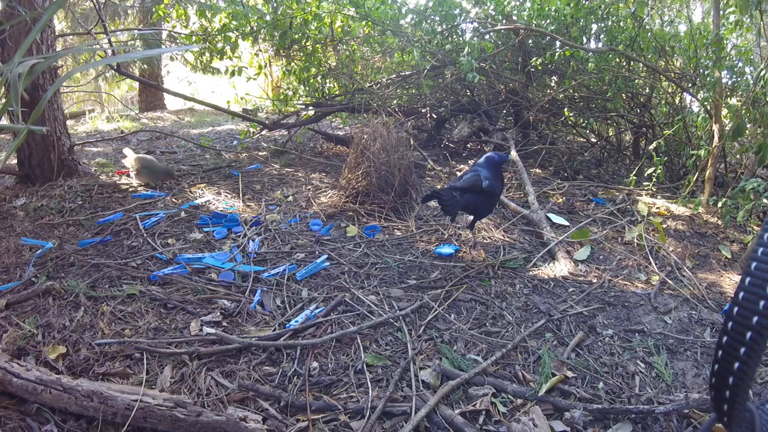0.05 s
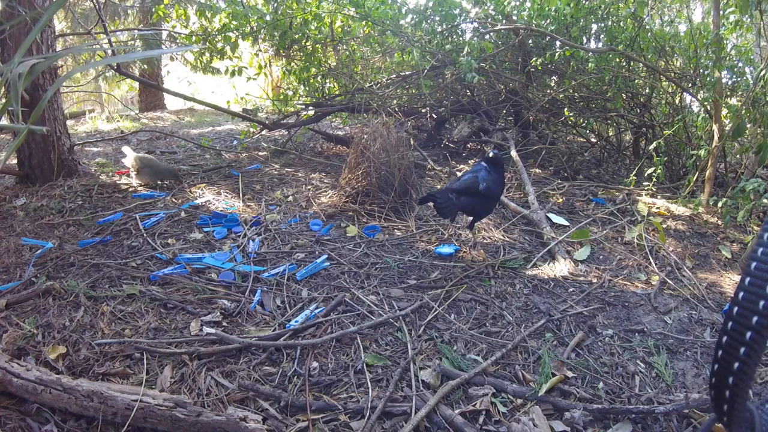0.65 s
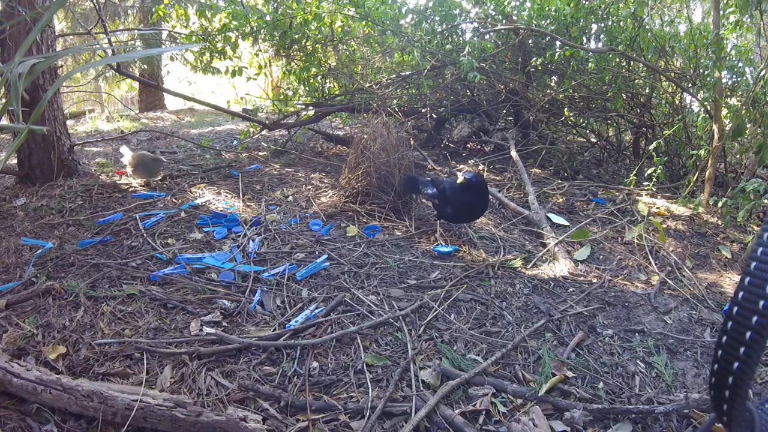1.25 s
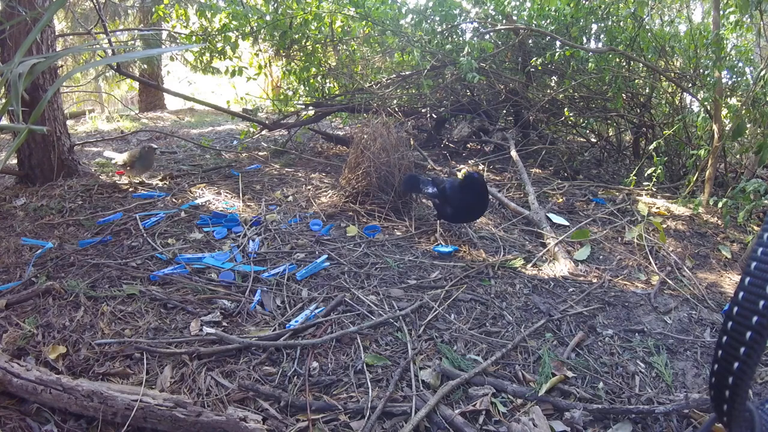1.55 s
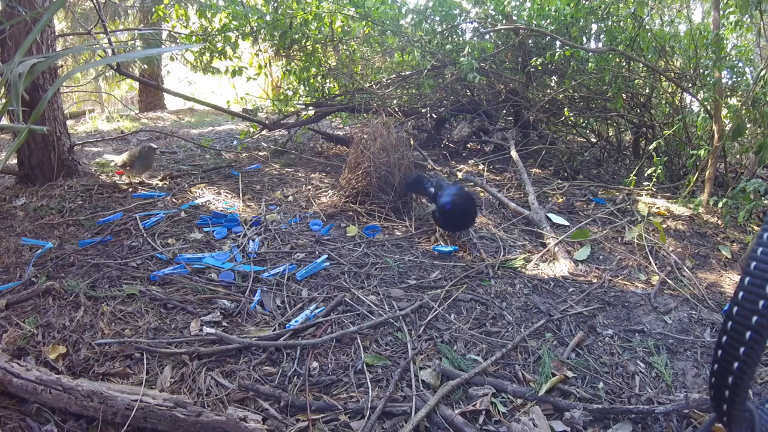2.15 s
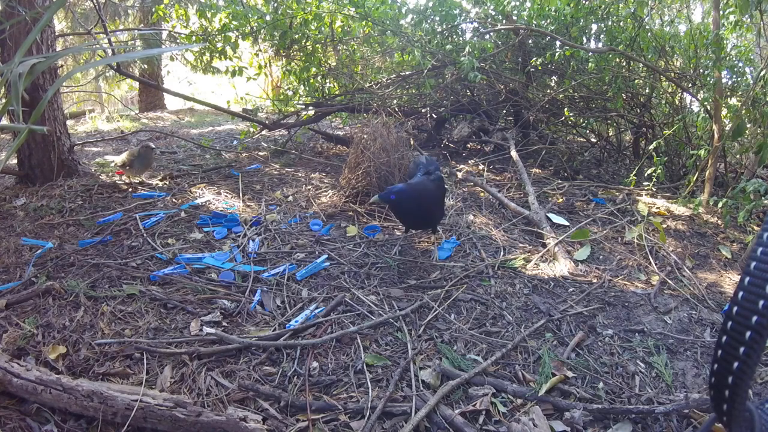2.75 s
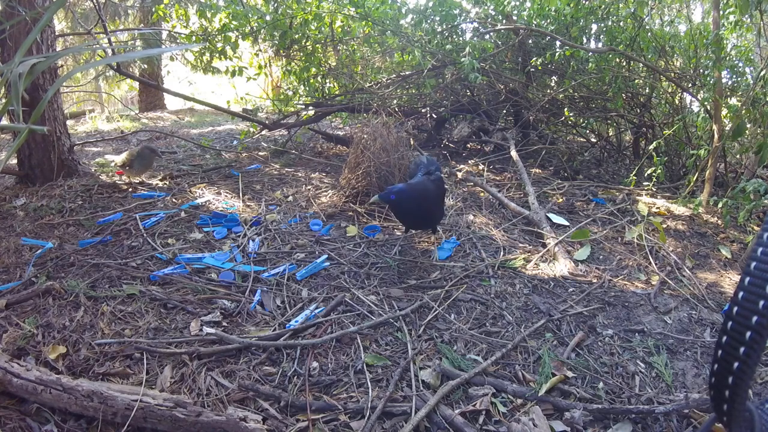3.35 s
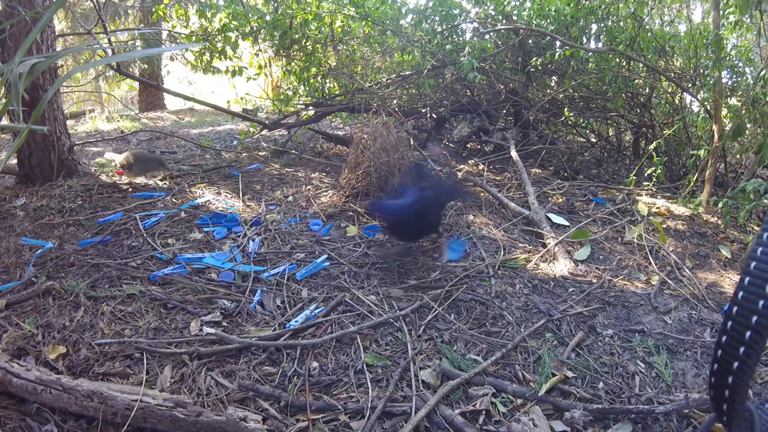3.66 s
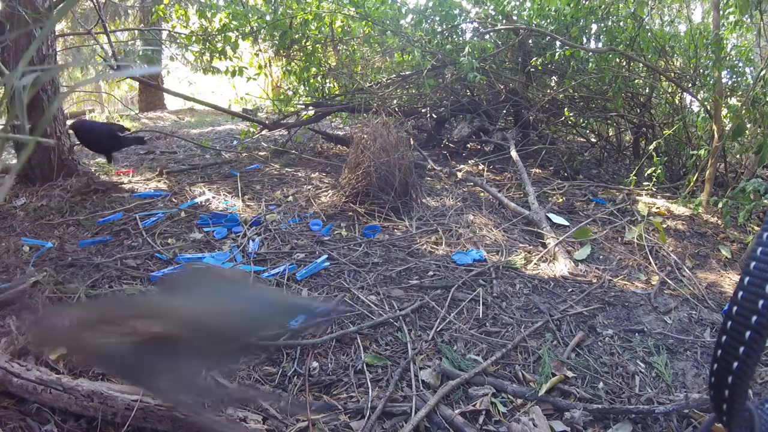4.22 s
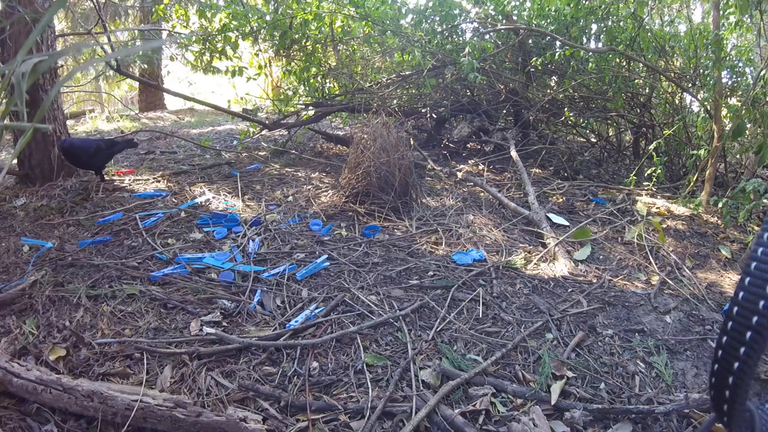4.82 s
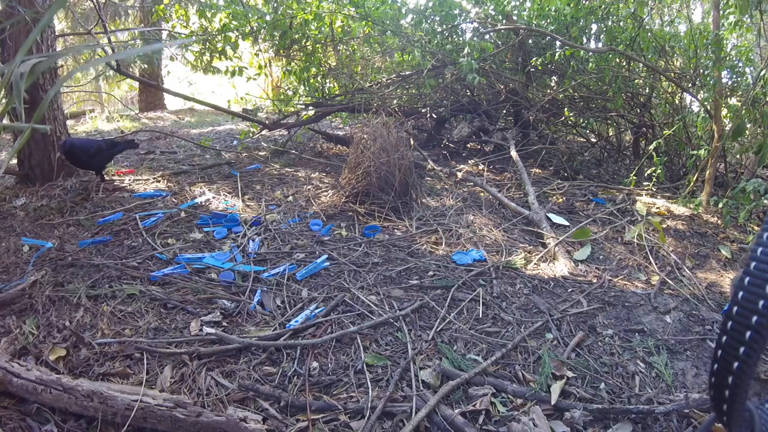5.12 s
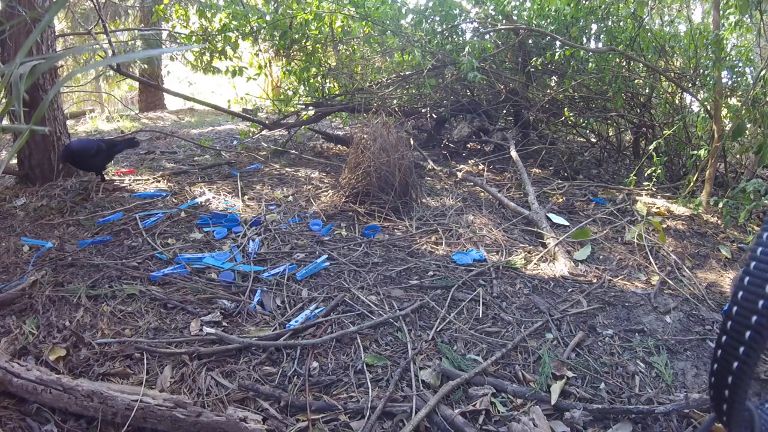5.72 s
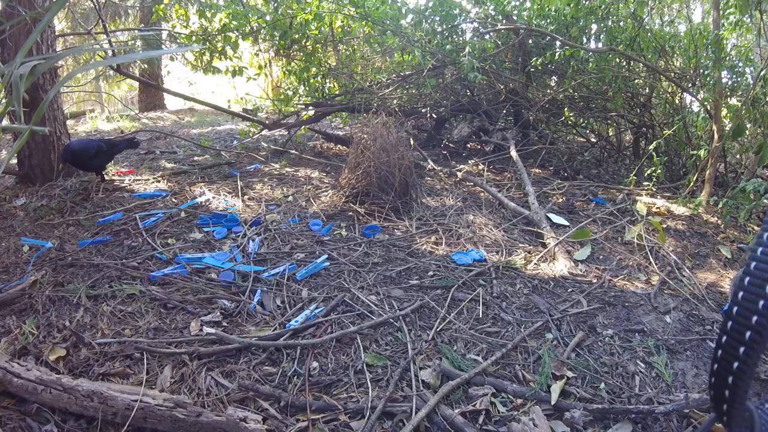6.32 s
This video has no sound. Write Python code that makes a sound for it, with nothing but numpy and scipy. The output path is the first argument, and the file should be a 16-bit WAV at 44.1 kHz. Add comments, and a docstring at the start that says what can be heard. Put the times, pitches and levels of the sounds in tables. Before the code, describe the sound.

On a forest floor, a male bowerbird gives one high, rasping chirp, then three louder ones in quick succession. Four hoarse, wheezy squawks follow, the longest carrying two falling whistles. Two birds take off with soft wingbeats through crackling leaves; one bumps something hollow and brushes close past the microphone. Two quieter hisses and a faint peep finish, over a low outdoor rumble.

```python
"""Forest floor, mono, over a low rumble, hum and faint hiss. A male bowerbird displays: four trilled,
rasping chirps, then four squawks (croak, then buzz and breath through throat and beak) with two sliding
whistles from the other side of the syrinx. Two birds take off through crackling leaf litter; one bumps
something hollow and brushes close by. The male ends with two quieter hisses and a soft peep between.
Trunks and bushes add a short echo to the calls and the litter."""
import sys
import numpy as np
from scipy import signal
from scipy.fft import rfft, irfft, next_fast_len
from scipy.io import wavfile
from scipy.ndimage import map_coordinates

SR = 44100
rng = np.random.default_rng(int(sys.argv[2]) if len(sys.argv) > 2 else 0)


def transcribe(u):
    """Save the signal u as a 16-bit wav file named by the first command-line argument.

    u: samples, shape (n,) or (channels, n), limited to [-1, 1]; the rate is SR.
    q: integer samples, one column per channel.
    """
    v = np.clip(np.atleast_2d(u).T, -1, 1)
    q = np.round(v * 32767).astype(np.int16)
    wavfile.write(sys.argv[1], SR, q)


N = 285768

# open beak response (frequency [Hz], gain [dB])
BEAK_RESPONSE = [(3000, -35), (4200, -8), (5200, 5), (5700, 2.5), (6400, 0), (7000, -15), (8500, -23.5),
                 (12000, -61), (15000, -77)]
# throat response in a hiss (frequency [Hz], gain [dB])
HISS_THROAT_RESPONSE = [(800, -32), (1400, -14), (1700, -1.5), (2050, 2.5), (2350, -0.5), (2850, 2.5),
                        (3600, -3.5), (4500, -9), (5500, -44)]
# dull impact (frequency [Hz], level [dB])
KNOCK_SPECTRUM = [(60, -26), (180, -17), (600, 0.5), (1000, -8), (1600, -17), (2400, -19), (4000, -64)]


def amp(db):
    """Decibels to gain."""
    return 10 ** (np.asarray(db) / 20)


def unit(x):
    """Scale to rms 1."""
    return x / np.sqrt(np.mean(x ** 2) + 1e-20)


def along(points, hz):
    """Interpolate (frequency [Hz], value) points on a log axis."""
    freqs, values = np.transpose(points)
    return np.interp(np.log(hz + 1), np.log(freqs + 1), values)


def clock(length_s):
    """Sample times [s]."""
    return np.arange(int(length_s * SR)) / SR


def add(track, start_s, x):
    """Mix x into the track."""
    i = int(np.clip(round(start_s * SR), 0, N))
    track[i:i + len(x)] += x[:N - i]


def white(n):
    """White noise, n samples."""
    return np.random.default_rng(rng.integers(2 ** 31)).standard_normal(n)


def wobble(n, rate_hz):
    """Smooth random curve with knots at rate_hz."""
    return map_coordinates(white(int(n * rate_hz / SR) + 4), [np.arange(n) * rate_hz / SR])


def colour(x, spectrum):
    """Filter by (frequency [Hz], gain [dB]) points; output at rms 1."""
    size = next_fast_len(len(x) + 2048)
    gain = amp(along(spectrum, np.fft.rfftfreq(size, 1 / SR)))
    return unit(irfft(rfft(x, size) * gain, size)[:len(x)])


def glide(x, speed):
    """Scale all frequencies by a varying factor."""
    return map_coordinates(x, [np.cumsum(speed)], mode="mirror")


def soft(x):
    """Fade both ends over 4 ms."""
    return x * signal.windows.tukey(len(x), .008 * SR / len(x))


def envelope(t, attack_s, length_s, release_s):
    """Linear rise, hold until length_s, exponential decay."""
    return np.clip(t / attack_s, 0, 1) * np.exp(-np.maximum(t - length_s, 0) / release_s)


def phase_of(hz):
    """Running phase [rad] of a frequency curve."""
    return 2 * np.pi * np.cumsum(hz) / SR


def blend(clean, noise, share):
    """Mix by the noise's share of the power."""
    share = np.clip(share, 0, 1)
    return np.sqrt(1 - share) * clean + np.sqrt(share) * noise


def buzzing(phase, orders):
    """Hoarse voice: each partial drifts in level and phase."""
    n = len(phase)
    voice = np.zeros(n)
    for k in orders:
        gain = amp(2.5 * wobble(n, 60))
        voice += gain * np.cos(k * (phase + .05 * wobble(n, 350)) + 2 * np.pi * rng.random())
    return unit(voice)


def background(rumble_db=-55.5, air_db=-66, hum_hz=74, hum_db=-57):
    """Outdoor rumble, wavering hum, thin steady hiss."""
    rumble_spectrum = [(12, -31), (22, -3.5), (35, -2), (50, -1), (70, -4.5), (100, -5.5), (163, -11),
                       (260, -16), (409, -21.5), (573, -23), (853, -23.5), (1170, -25.5), (3000, -32.5),
                       (3900, -50), (6600, -120)]  # (frequency [Hz], level [dB])
    air_spectrum = [(1500, -32), (3000, -11), (4300, -14.5), (5800, -9.5), (6200, -7.5), (6500, 4.5),
                    (7000, -3.5), (8500, -6), (10000, -13.5), (12000, -13), (13200, -21), (14000, -41)]  # (frequency [Hz], level [dB])
    hum = np.sqrt(2) * np.sin(phase_of(hum_hz * (1 + .03015 * wobble(N, 12))))
    hum *= amp(hum_db + .99 * wobble(N, 6))
    rumble = amp(rumble_db) * colour(white(N), rumble_spectrum)
    return hum + rumble + amp(air_db) * colour(white(N), air_spectrum)


def forest_echo(x):
    """Trunks and bushes scatter a short, bright tail."""
    scatter = [(300, -29), (1500, 6.5), (3000, 5), (4100, -4), (5200, 2), (6400, 3), (7500, 3),
               (12000, -15)]  # twig reflection (frequency [Hz], gain [dB])
    decay = [(200, 0.17), (2000, 0.16), (6000, 0.21), (12000, 0.096)]  # echo decay (frequency [Hz], t60 [s])
    hz, t, bins = signal.stft(white(SR // 3), SR, nperseg=256)
    gain = amp(along(scatter, hz)[:, None] - 60 * t / along(decay, hz)[:, None])
    tail = signal.istft(bins * gain, SR, nperseg=256)[1]
    return signal.fftconvolve(x, np.pad(tail, (200, 0)) / np.linalg.norm(tail))[:N]


def leaf_litter(rustle_db=-1, grain_db=3.5, fall_s=.034, snap_t60_s=.014, settle_db=-17, settle_t60_s=.22):
    """Feet and wings stir dry leaves in grainy swells; twigs snap and the leaves settle."""
    scuffs = [(3.755, 0.055, -45), (3.89, 0.065, -47.5), (3.947, 0.012, -46.5), (4.08, 0.064, -43),
              (4.195, .04, -51), (4.419, 0.083, -46), (4.615, 0.076, -47.5)]  # rustle swells (crest [s], rise [s], level re rustle_db [dB])
    snaps = [(.337, -46.5), (3.644, -36.5), (3.664, -35), (3.689, -32), (3.887, -30.5), (3.942, -35.5),
             (3.95, -27.5), (3.989, -29.5), (4.017, -28.5), (4.024, -25), (4.123, -30), (4.186, -36.5),
             (4.302, -36), (4.505, -36.5)]  # twig, leaf and quill ticks (time [s], peak [dB])
    leaf_spectrum = [(290, -8), (500, -4), (616, -7.5), (1030, -15.5), (1590, -5.5), (2160, -7.5),
                     (2520, -7), (4160, -7.5), (5740, 5.5), (9210, -12.5), (12500, -28.5), (14000, -53)]  # (frequency [Hz], level [dB])
    t = np.arange(N) / SR
    swells = [amp(db) * np.exp(-np.maximum((crest_s - t) / rise_s, (t - crest_s) / fall_s))
              for crest_s, rise_s, db in scuffs]
    grains = colour(white(N) * amp(grain_db * wobble(N, 1200)), leaf_spectrum)
    out = amp(rustle_db) * np.linalg.norm(swells, axis=0) * grains
    t = clock(.1)
    lead = SR // 200
    fade = amp(-60 * t / snap_t60_s) + amp(settle_db - 60 * t / settle_t60_s)
    for at_s, peak_db in snaps:
        snap = colour(np.pad(fade * white(len(t)), (lead, 0)), leaf_spectrum)
        add(out, at_s - lead / SR, amp(peak_db) * snap / np.abs(snap).max())
    return out


def footfalls(decay_s=.0085):
    """Feet knock dully on twigs and ground."""
    kicks = [(3.886, -42.5), (3.948, -49.5), (4.02, -47)]  # (time [s], level [dB])
    out = np.zeros(N)
    t = clock(6 * decay_s)
    for at_s, db in kicks:
        add(out, at_s, soft(amp(db) * np.exp(-t / decay_s) * colour(white(len(t)), KNOCK_SPECTRUM)))
    return out


def wingbeats(push_hz=36, push_width_s=.014, whoosh_width_s=.02):
    """Each stroke pushes a slow air wave with a soft whoosh."""
    strokes = [(3.824, -42, -48), (3.887, -43, -52), (3.954, -50, -53), (3.996, -43, -53),
               (4.055, -46, -47.5), (4.109, -42, -51.5), (4.142, -58, -47), (4.177, -58, -47.5),
               (4.435, -44.5, -60)]  # (time [s], push [dB], whoosh [dB])
    whoosh_spectrum = [(60, -7), (130, 1.5), (220, 0), (330, -5.5), (620, -11), (1200, -15.5), (3000, -32),
                       (8000, -60)]  # (frequency [Hz], level [dB])
    out = np.zeros(N)
    t = np.arange(-SR // 10, SR // 10) / SR
    push = np.sqrt(2) * np.sin(2 * np.pi * push_hz * t) * np.exp(-(t / push_width_s) ** 2)
    for at_s, push_db, whoosh_db in strokes:
        whoosh = colour(white(len(t)), whoosh_spectrum) * np.exp(-(t / whoosh_width_s) ** 2)
        add(out, at_s + t[0], amp(push_db) * push + amp(whoosh_db) * whoosh)
    return out


def feather_brush(closest_s=4.328, closest_db=-26.5, width_s=.0029, lead_s=.022, trail_s=.1):
    """Feathers brush past; level falls with distance."""
    feather_spectrum = [(350, -60), (600, -27), (1190, -15), (1430, -26), (2540, -15), (3030, -7),
                        (4010, -14.5), (6400, 4), (7510, -5), (9430, -6.5), (14700, -41)]  # (frequency [Hz], level [dB])
    out = np.zeros(N)
    t = clock(lead_s + trail_s) - lead_s
    feathers = colour(white(len(t)) * amp(3.4 * wobble(len(t), 1504)), feather_spectrum)
    add(out, closest_s - lead_s, soft(amp(closest_db) * feathers / np.hypot(1, t / width_s)))
    return out


def hollow_bumps(attack_s=.0022, knock_db=-12, knock_t60_s=.14):
    """Soft blows ring the low modes of a nearby hollow object."""
    blows = [(4.201, -22), (4.243, -41), (4.45, -44)]  # (time [s], level [dB])
    modes = [(124.7, -12.5, 0.37), (164, -7.5, 0.36), (202.8, 5.5, 0.19), (206, -15, 0.87),
             (233.7, -4, 0.3), (339, -10, 0.24), (379, -8, 0.14), (490, -1, 0.095), (523, -10, 0.21),
             (564, -12, 0.16), (718, -10.5, 0.11), (857, -15.5, 0.11), (1010, -17, 0.055),
             (1470, -17, 0.069)]  # (frequency [Hz], level re blow [dB], t60 [s])
    out = np.zeros(N)
    t = clock(.6)
    onset = 1 - np.exp(-(t / attack_s) ** 2)
    for at_s, db in blows:
        ring = np.zeros(len(t))
        for hz, mode_db, t60_s in modes:
            gain = amp(mode_db + rng.normal(0, 1) - 60 * t / t60_s)
            ring += gain * np.sin(2 * np.pi * hz * t + rng.normal(0, .92))
        knock = amp(knock_db - 60 * t / knock_t60_s) * colour(white(len(t)), KNOCK_SPECTRUM)
        add(out, at_s, amp(db) * (ring + knock) * onset)
    return out


def bill_clicks(decay_s=.0049):
    """The bill snaps shut and rings briefly."""
    clicks = [(.999, -43.5), (1.017, -48)]  # (time [s], level [dB])
    out = np.zeros(N)
    t = clock(8 * decay_s)
    for at_s, db in clicks:
        add(out, at_s, amp(db) * np.exp(-t / decay_s) * colour(white(len(t)), BEAK_RESPONSE))
    return out


def peep(start_s=6.2, length_s=.068, crest_hz=408, pitch_arch=.049, db=-65.5):
    """Soft nasal note: partials 4 and 5 of an arching pitch, through the throat."""
    out = np.zeros(N)
    rise = np.sin(np.pi * clock(length_s) / length_s)
    voice = buzzing(phase_of(crest_hz * (1 - pitch_arch * (1 - rise))), (4, 5))
    add(out, start_s, amp(db) * rise ** 2 * colour(voice, HISS_THROAT_RESPONSE))
    return out


def hisses(throat_attack_s=.026, beak_attack_s=.17, release_s=.021):
    """Voiceless breath starts in the throat; then the beak opens."""
    calls = [(5.54, .32, -55.5, -48), (6.417, .075, -57, -51)]  # (start [s], length [s], throat [dB], beak [dB])
    beak_response = [(3500, -20), (4600, -8), (4950, 0), (5250, -7), (5520, 7), (5700, 0), (6100, -6),
                     (6500, -17), (9000, -32), (13000, -60)]  # (frequency [Hz], gain [dB])
    out = np.zeros(N)
    for start_s, length_s, throat_db, beak_db in calls:
        t = clock(length_s + 4 * release_s)
        throat = amp(throat_db) * colour(white(len(t)), HISS_THROAT_RESPONSE)
        beak = amp(beak_db) * colour(white(len(t)), beak_response)
        add(out, start_s, throat * envelope(t, throat_attack_s, length_s, release_s))
        add(out, start_s, beak * envelope(t, beak_attack_s, length_s, release_s))
    return out


def wheeze_arches(time_s, hz, throat_db=0, beak_db=0, rough=.903, flatness=3.25):
    """Pitch, roughness and levels of a wheeze as it arches up into a clearer voice."""
    # (crest [s], half length [s], crest pitch [Hz], roughness [0-1], throat [dB], beak [dB])
    arches = [(1.618, .03, 733, 0.13, -44, -41), (2.101, 0.035, 862, 0.02, -39, -39),
              (2.181, 0.043, 761, 0.3, -38, -39), (2.476, 0.044, 959, 0.17, -38, -38.5),
              (2.649, .042, 882, 0.22, -40.5, -35.5), (2.837, 0.041, 720, 0.75, -43.5, -39.5),
              (3.297, 0.034, 860, 0.14, -41.5, -42.5)]
    for crest_s, half_s, crest_hz, crest_rough, crest_throat_db, crest_beak_db in arches:
        away = np.minimum(np.abs(time_s - crest_s) / half_s, 1)
        clear = 1 - away ** flatness
        hz = hz + (crest_hz - hz) * (1 - away ** 2)
        rough = rough + (crest_rough - rough) * clear
        throat_db = throat_db + (crest_throat_db - throat_db) * clear
        beak_db = beak_db + (crest_beak_db - beak_db) * clear
    return hz, rough, throat_db, beak_db


def whistles(drop=.47, bend=1.31, swell_db=7.5, edge_s=.0066, hoarse_hz=680):
    """The other side of the syrinx holds a note, then slides down; the buzz adds side bands."""
    notes = [(2.402, 0.00304, 0.0232, 2150, -49), (2.617, 0.034, .028, 2305, -39.5)]  # (start [s], hold [s], slide [s], held pitch [Hz], held level [dB])
    # beak resonance (frequency [Hz], gain [dB])
    beak_lift = [(2800, -26), (4600, -1.5), (5500, 2), (7200, -36)]
    octave_db, low_band_db, high_band_db = 2, -9, -3
    out = np.zeros(N)
    for start_s, hold_s, slide_s, top_hz, db in notes:
        t = clock(hold_s + slide_s)
        fallen = np.clip((t - hold_s) / slide_s, 0, 1) ** bend
        hz = top_hz * (1 - drop * fallen)
        phase = phase_of(hz * (1 + .014 * wobble(len(t), 664)))
        buzz_phase = phase_of(wheeze_arches(start_s + t, hoarse_hz)[0])
        low = np.sin(phase) + amp(low_band_db) * np.sin(phase + buzz_phase)
        high_bands = np.sin(2 * phase + buzz_phase) + np.sin(2 * (phase + buzz_phase))
        high = np.sin(2 * phase) + amp(high_band_db) * high_bands
        lift = amp(octave_db + along(beak_lift, 2 * hz))
        gain = amp(db + swell_db * fallen) * np.minimum(np.minimum(t, t[::-1]) / edge_s, 1)
        add(out, start_s, gain * np.sqrt(2) * (low + lift * high))
    return out


def croak(t, length_s=.071, fall_per_s=2.47, mid_hz=240, breath=.25):
    """Low growl; pitch and resonances slide down as the throat swells."""
    open_throat = [(500, -53), (950, -29.5), (1250, -5), (1500, -1), (2300, -2), (2900, -3.5),
                   (3500, -10.5), (4100, -6), (4700, -28), (6000, -62)]  # (frequency [Hz], gain [dB])
    growl = buzzing(phase_of(mid_hz * (1 + .015 * wobble(len(t), 300))), range(3, 21))
    breathy = blend(colour(growl, open_throat), colour(white(len(t)), open_throat), breath)
    slide = np.exp(-fall_per_s * (np.minimum(t, length_s) - length_s / 2))
    return glide(breathy, slide) * np.exp(-(t / length_s) ** 8)


def squawks(jitter=.0278, throat_breath=.7, beak_breath=.2, opening_s=.064, wheeze_attack_s=.14):
    """A croak bursts through the beak into a hoarse wheeze that rings in throat and beak."""
    # (start [s], length [s], release [s], pitch [Hz], croak [dB], wheeze throat [dB], wheeze beak [dB])
    calls = [(1.502, 0.23, .016, 530.5, -38, -49, -41), (1.986, 0.23, 0.0039, 570, -40, -48.5, -37),
             (2.36, 0.513, 0.015, 660, -36, -48.5, -42), (3.179, 0.24, 0.018, 695, -38.5, -47.5, -40.5)]
    throat_response = [(330, -28), (500, -13), (850, -21), (1050, -15), (1400, -3.5), (1750, 0), (2100, -7),
                       (2450, -2.5), (2850, 1.5), (3400, -5), (4100, -3.5), (4700, -53), (6000, -64)]  # (frequency [Hz], gain [dB])
    burst_at_s, burst_width_s, burst_re_croak_db = .055, .015, 1
    out = np.zeros(N)
    for start_s, length_s, release_s, hoarse_hz, croak_db, throat_db, beak_db in calls:
        t = clock(length_s + 4 * release_s)
        n = len(t)
        hz, rough, throat_db, beak_db = wheeze_arches(start_s + t, hoarse_hz, throat_db, beak_db)
        phase = phase_of(hz * (1 + (.018 + jitter * rough) * wobble(n, 700)))
        voice = buzzing(phase, range(1, 15))
        # one air puff per cycle, fluttering with roughness
        puffs = (1 + .27 * np.cos(phase)) * amp(.24 * rough * wobble(n, 410))
        throat_air = colour(white(n) * puffs, throat_response)
        beak_air = colour(white(n) * puffs, BEAK_RESPONSE)
        throat = blend(colour(voice, throat_response), throat_air, throat_breath * rough)
        beak = blend(colour(voice, BEAK_RESPONSE), beak_air, beak_breath + rough)
        burst = amp(burst_re_croak_db) * np.exp(-np.abs(t - burst_at_s) / burst_width_s) * beak
        wheeze = amp(throat_db) * throat + amp(beak_db) * beak
        wheeze *= envelope(t, wheeze_attack_s, length_s, release_s)
        opening = np.sin(np.pi / 2 * np.minimum(t / opening_s, 1))
        add(out, start_s, soft(opening * (amp(croak_db) * (croak(t) + burst) + wheeze)))
    return out


def chirps(trill_hz=195, trill_depth=.16, buzz_ratio=.32, buzz_depth=.5, sag_hz_per_s=7000):
    """Two high voices climb and swell, swept by a fast trill that deepens and rasps with roughness."""
    # (start [s], attack [s], climb [s], first pitch [Hz], top pitch [Hz], upper voice top [Hz],
    #  first roughness [ratio], top roughness [ratio], main voice [dB], upper voice [dB])
    notes = [(.123, 0.021, 0.063, 3280, 3620, 5650, 0.82, 1.2, -38, -45.5),
             (1.02, 0.055, .074, 2203, 4017, 5740, 0.26, 0.17, -28.5, -33.5),
             (1.148, 0.025, 0.067, 3540, 4236, 6180, 0.8, 0.44, -32.5, -36),
             (1.273, 0.026, 0.085, 3385, 4230, 6100, 0.76, 0.42, -34.5, -39)]
    main_spectrum = [(800, -31), (1300, -17), (1900, -11), (2650, -10), (4000, 5.5), (5000, -3), (6200, -9),
                     (8000, -6.5), (14000, -60)]  # main voice rasp (frequency [Hz], level [dB])
    upper_spectrum = [(2500, -29), (4400, -1), (5500, 1), (6400, 8), (6900, -5), (8200, -8), (9100, -24),
                      (10400, -18), (12000, -53), (14000, -65)]  # upper voice rasp (frequency [Hz], level [dB])
    main_ref_hz, upper_ref_hz = 4000, 6100  # pitches at which the spectra are unshifted
    main_rasp_share, upper_rasp_share = .42, .57
    main_release_s, upper_release_s, break_up_s = .008, .016, .02
    upper_trill, upper_follow, rasp_follow, main_swell, upper_swell = .82, .6, .8, 1.4, 1.7  # exponents
    out = np.zeros(N)
    for (start_s, attack_s, climb_s, first_hz, top_hz, upper_top_hz,
         first_rough, top_rough, main_db, upper_db) in notes:
        t = clock(climb_s + 4 * upper_release_s)
        n = len(t)
        to_go, after_s = np.maximum(1 - t / climb_s, 0), np.maximum(t - climb_s, 0)
        hz = top_hz - (top_hz - first_hz) * to_go ** 2 - sag_hz_per_s * after_s
        height = hz / top_hz
        rough = np.interp(t, [climb_s / 2, climb_s * 7 / 8, climb_s, climb_s + break_up_s],
                          [first_rough, top_rough, top_rough, 1])
        trill = np.sin(phase_of(trill_hz * (1 + .13 * wobble(n, 123.7))))
        bend = 1 + rough * (trill_depth * trill + .046 * wobble(n, 1509)) + .02 * wobble(n, 912)
        # a slower membrane vibration adds side bands
        buzz = 1 + buzz_depth * np.sin(phase_of(buzz_ratio * hz * (1 + .166 * wobble(n, 887))))
        main = unit(buzz * np.sin(phase_of(hz * bend)))
        upper_hz = upper_top_hz * height ** upper_follow * bend ** upper_trill
        upper = unit(np.sin(phase_of(upper_hz * (1 + .049 * wobble(n, 1400)))))
        # rasp pulses with the trill, brightens with pitch
        puffs = unit(1 + .5 * trill)
        main_rasp = glide(colour(white(n), main_spectrum), (hz / main_ref_hz) ** rasp_follow)
        upper_shift = upper_top_hz / upper_ref_hz * height ** rasp_follow
        upper_rasp = glide(colour(white(n), upper_spectrum), upper_shift)
        main = blend(main, puffs * main_rasp, main_rasp_share * rough)
        upper = blend(upper, puffs * upper_rasp, upper_rasp_share * rough)
        main *= amp(main_db) * envelope(t, attack_s, climb_s, main_release_s) * height ** main_swell
        upper *= amp(upper_db) * envelope(t, attack_s, climb_s, upper_release_s) * height ** upper_swell
        add(out, start_s, soft(main + upper))
    return out


def scene(chirp_echo_db=-17, other_echo_db=-25):
    """All sources, identical in both channels."""
    trills = chirps()
    calls_and_leaves = squawks() + whistles() + hisses() + peep() + bill_clicks() + leaf_litter()
    echo = forest_echo(amp(chirp_echo_db) * trills + amp(other_echo_db) * calls_and_leaves)
    take_off = wingbeats() + feather_brush() + footfalls() + hollow_bumps()
    mono = trills + calls_and_leaves + echo + take_off + background()
    return np.array([mono, mono])


def record(dry, cutoff_hz=14000):
    """Brick-wall low-pass."""
    size = next_fast_len(N + SR // 2)
    passband = np.fft.rfftfreq(size, 1 / SR) < cutoff_hz
    return irfft(rfft(dry, size) * passband, size)[:, :N]


dry = scene()
out = record(dry)
transcribe(out)
```